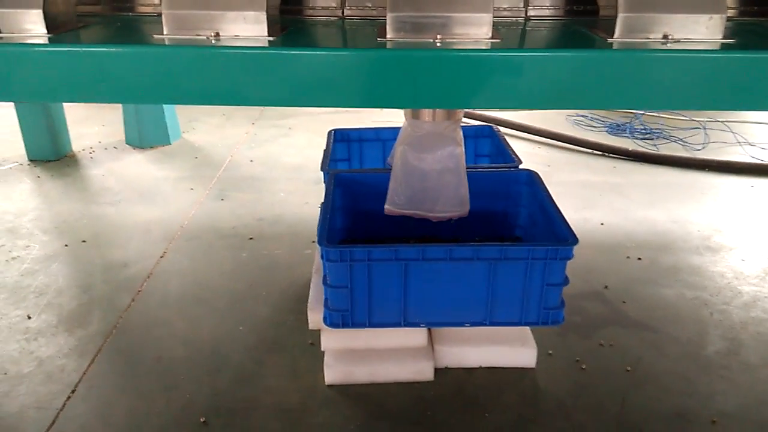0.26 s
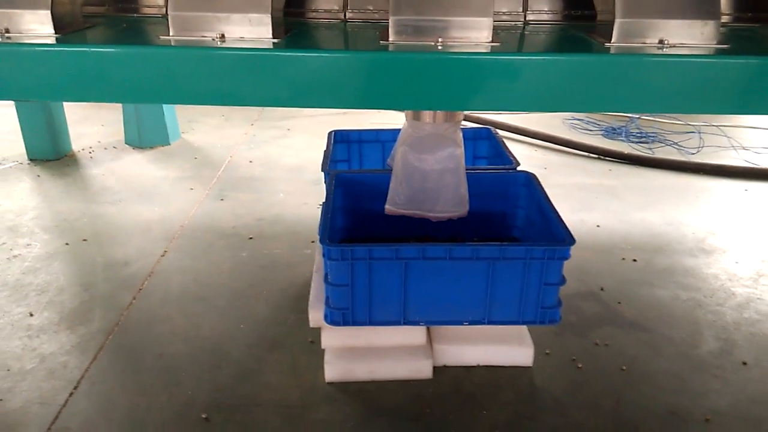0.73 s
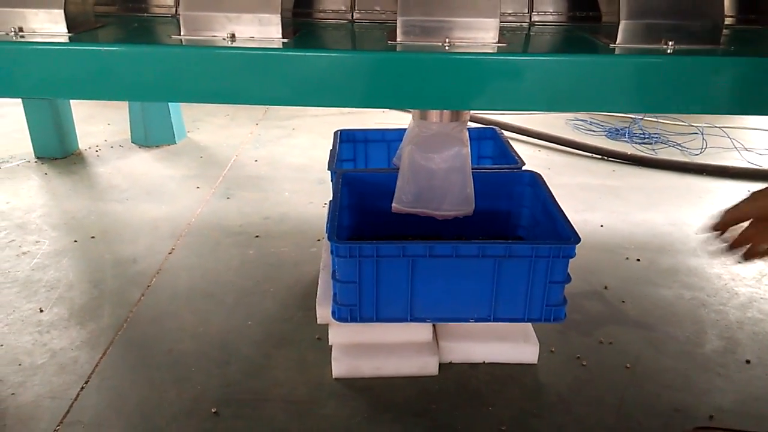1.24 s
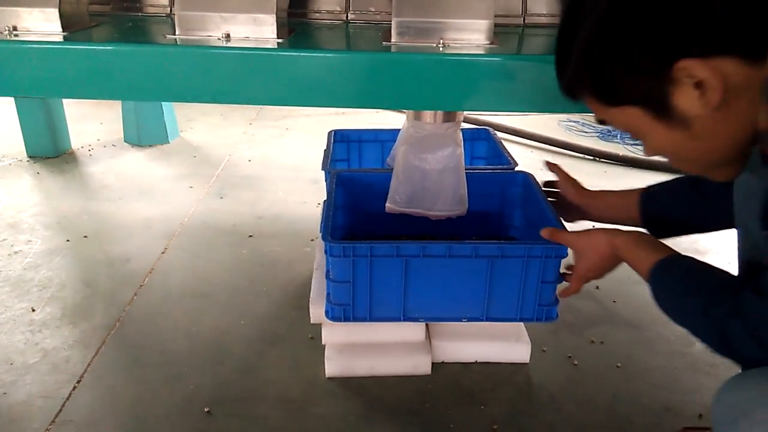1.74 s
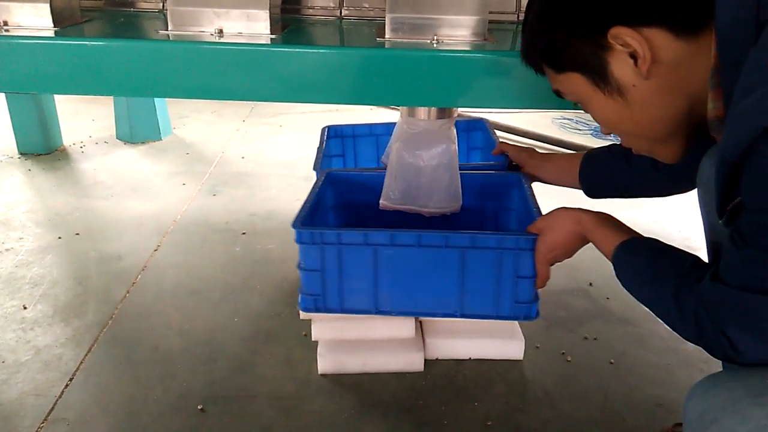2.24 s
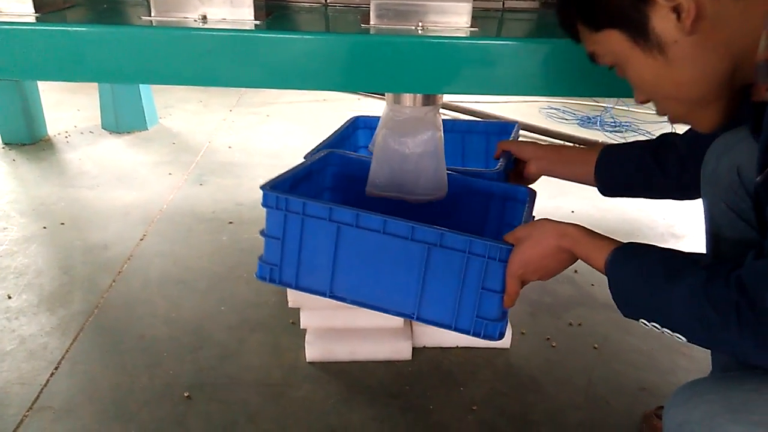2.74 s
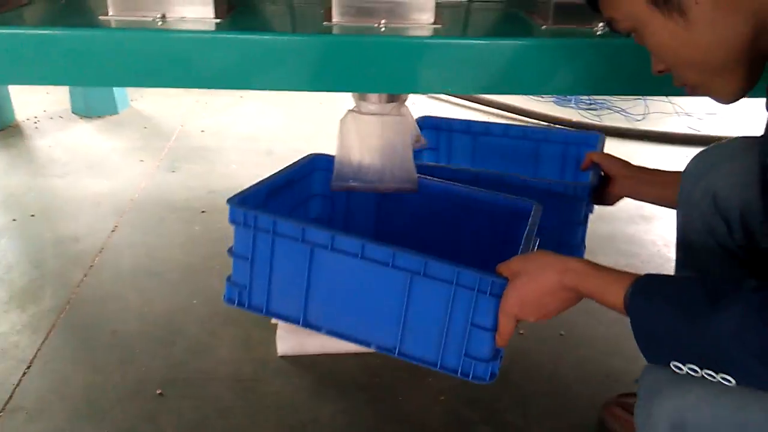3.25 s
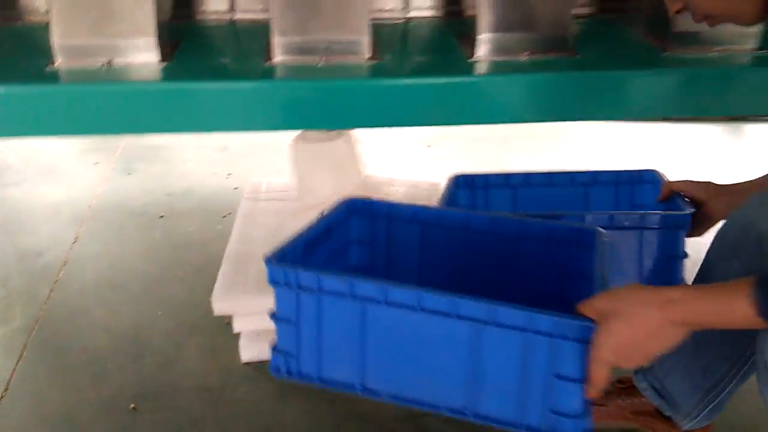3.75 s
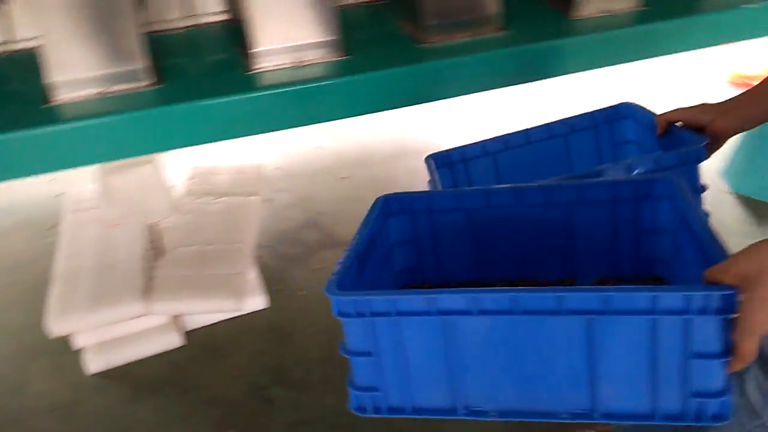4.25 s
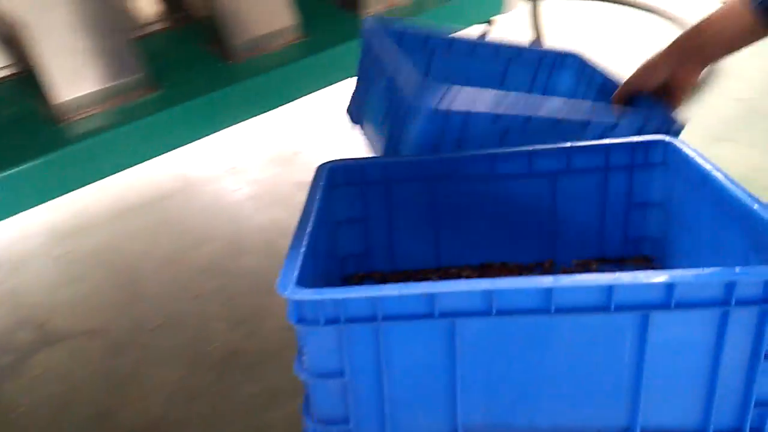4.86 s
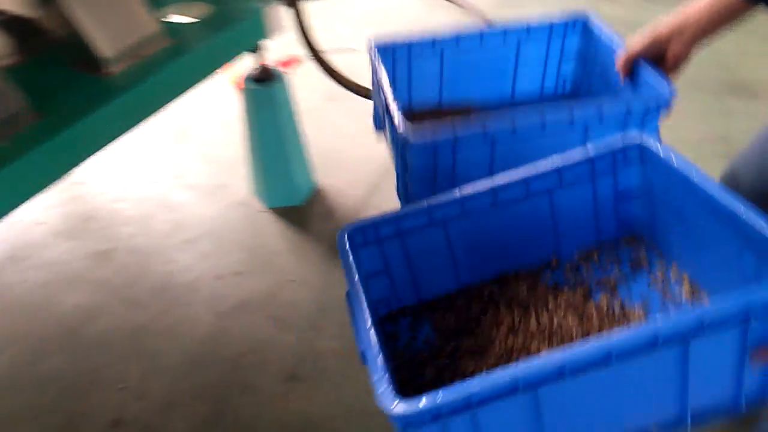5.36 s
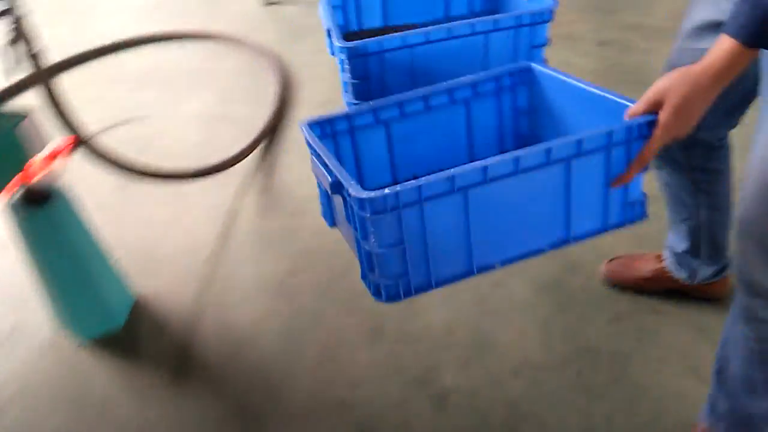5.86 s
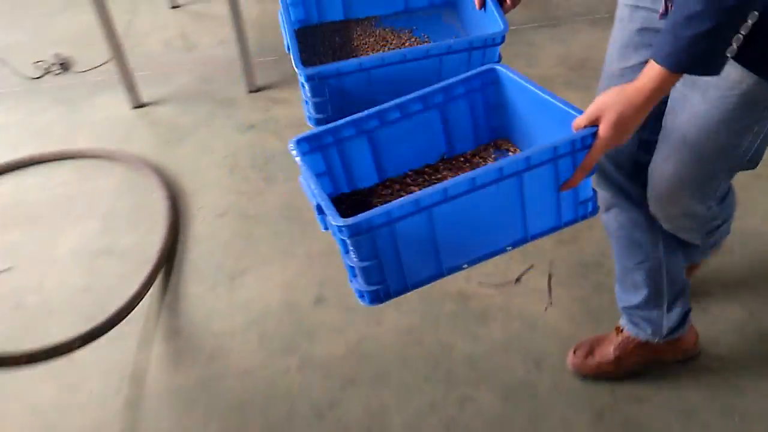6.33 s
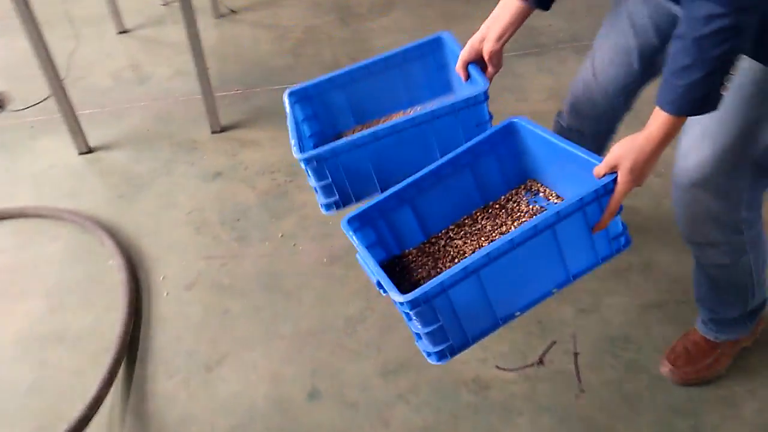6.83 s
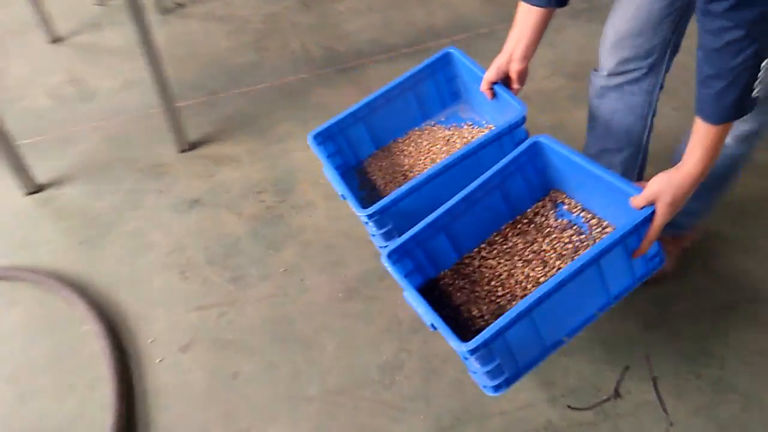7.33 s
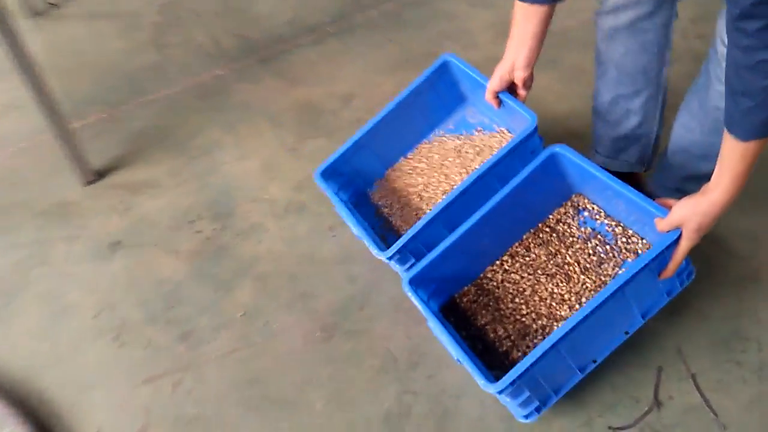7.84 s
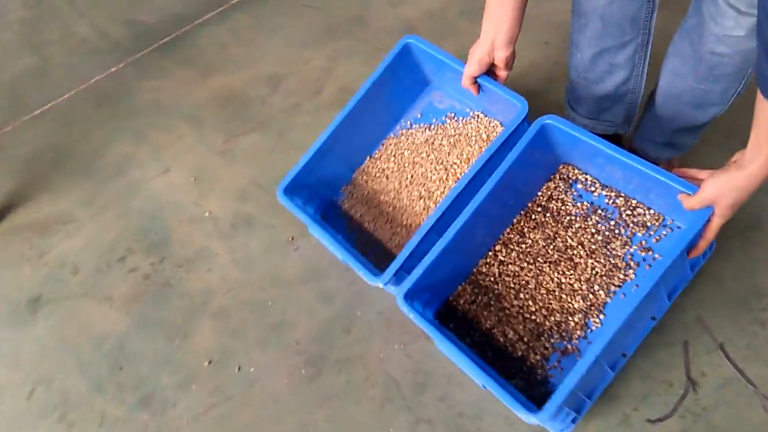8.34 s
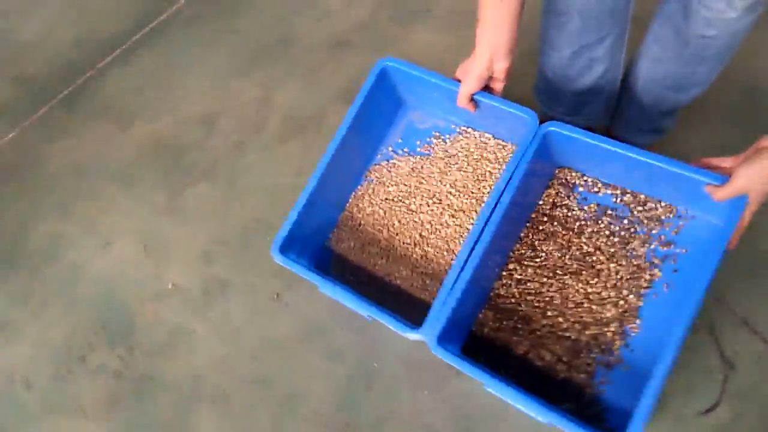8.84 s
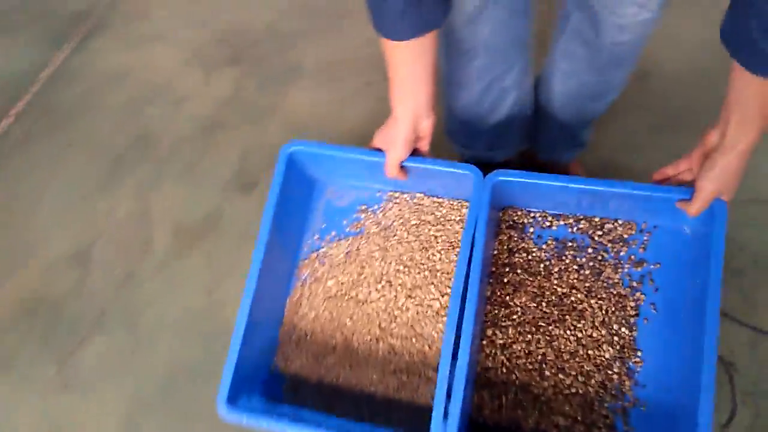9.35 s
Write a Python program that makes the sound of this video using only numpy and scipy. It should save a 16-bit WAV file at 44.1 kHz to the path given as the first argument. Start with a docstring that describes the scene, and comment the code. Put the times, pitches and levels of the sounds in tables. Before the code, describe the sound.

Close stereo handheld microphone in a workshop. Beans tick and patter into plastic bins over a low wavering hum; a valve spits and blasts air, hissing away. Bins are dragged out with dull knocks, creaks and clicks. Beans slide, bursting into one very loud, distorted rush halfway, then several softer swishes, scuffs, brushing cloth and loose bean ticks.

```python
"""Beans patter through plastic bins while a sorting machine hums; soon a valve spits, blasts and hisses on.
Then the bins are pulled out: knocks, clicks, creaks and scuffs join rushes of beans, the fiercest at five seconds.
Later come loose beans and brushing clothes; a faint hollow tone appears early and again near the end.
Beans and rubbing are showers of tiny impacts, knocks are pushed resonances, air is shaped noise, the hum two sines.
A hand-held camera with two microphone ports stands close by in a workshop."""
import sys
import numpy as np
from scipy import signal
from scipy.fft import rfft, irfft, next_fast_len
from scipy.io import wavfile
from scipy.ndimage import uniform_filter1d, map_coordinates

SR = 44100
rng = np.random.default_rng(int(sys.argv[2]) if len(sys.argv) > 2 else 0)


def store_pcm(level_fs):
    """Save levels as 16-bit WAV."""
    pcm = np.round(np.clip(level_fs, -1, 1) * 32767).astype(np.int16)
    wavfile.write(sys.argv[1], SR, np.atleast_2d(pcm).T)


N = 422912

# Levels in the tables are before the small trims set in each source's function.
# Beans sliding over plastic as a bin tilts. Each row: start in seconds, rise in seconds, hold in seconds,
# fall time t60 in seconds, patter level in dB, bin wall level in dB.
SLIDES = [(-0.01, 0.0085, 0.022, 1.1, -38.5, -59), (0.19, 0.038, .025, 0.29, -41.5, -55.5),
          (0.33, .06, .05, .4, -56, -87), (0.48, .015, .02, .35, -50, -82),
          (2.0, .16, 0.017, 0.32, -48.5, -57), (2.27, 0.029, 0.12, .6, -59.5, -66),
          (2.41, 0.093, 0.072, 2.1, -44.5, -60), (2.66, 0.27, 0.18, .7, -44.5, -59),
          (3.0, 0.1, 0.52, 1, -43.5, -52), (3.52, .08, 0.057, 0.64, -38, -42),
          (3.74, .04, 0.12, 2.2, -41.5, -49), (4.08, .2, .07, 1.06, -29.5, -40),
          (4.76, 0.077, 0.076, 0.58, -47, -52.5), (4.912, 0.079, 0.0048, 0.23, -12, -26.5),
          (5.022, 0.057, 0.038, .15, 3, -14), (5.15, .06, 0.023, 0.38, -32, -54.5),
          (5.585, 0.076, 0.025, 0.84, -26.5, -37.5), (5.7, 0.14, 0.22, 0.52, -25, -35),
          (6.28, 0.025, 0.16, .9, -46.5, -59), (6.435, .09, 0.015, .42, -21.5, -33.5),
          (6.56, 0.097, 0.089, 0.53, -34.5, -43.5), (6.71, 0.051, 0.03, 0.3, -30.5, -59),
          (8.22, 0.053, 0.081, 1.4, -48.5, -58), (8.41, 0.096, 0.082, 0.87, -43, -53.5)]
# Heaps of beans jolted in a bin. Each row: start in seconds, level in dB, fall time t60 in seconds.
JOLTS = [(3.865, -43, 0.25), (4.902, -36.5, 0.13), (4.93, -32.5, 0.23), (4.962, -15, 0.056),
         (6.447, -37.5, .15), (6.471, -24.5, 0.088), (7.939, -33, 0.15), (7.954, -29, .17),
         (8.302, -37, 0.076)]
# Clearest clicks of beans and bin rims. Each row: time in seconds, snap peak in dB, body in dB re snap peak.
CLICKS = [(0.0395, -14.5, -31), (0.0643, -20.5, -31.5), (0.0802, -21, -20), (0.1016, -11.5, -24),
          (0.1137, -18.5, -29), (0.1287, -17, -25), (0.1476, -18.5, -11.5), (0.2209, -27, -17),
          (0.2455, -24, -18), (0.2853, -23.5, -11.5), (0.4003, -29.5, -33), (0.4462, -23.5, -19),
          (0.4814, -20.5, -11), (0.485, -18, -11), (0.5016, -19.5, -14.5), (3.2088, -12, -34.5),
          (3.245, -10.5, -20), (3.3682, -13, -34), (3.371, -9, -15.5), (3.3804, -20.5, -6),
          (3.4655, -15.5, -23.5), (3.5375, -17, -27.5), (3.545, -16.5, -9.5), (3.798, -21.5, -3.5),
          (4.4982, -19.5, -11), (4.534, -24.5, -12), (4.633, -20, -16.5), (4.7387, -24.5, -11.5),
          (5.9354, -12.5, -23.5), (6.4717, -16, -15), (6.899, -30.5, -20.5), (6.914, -29, -20.5),
          (7.0534, -38.5, -21), (7.0773, -36, -11.5), (7.425, -25, -40), (8.2867, -31.5, 4.5),
          (8.343, -29, -26.5), (8.6921, -32.5, -28), (8.7208, -30.5, -30), (8.9101, -31.5, -26.5),
          (8.9244, -33.5, -33), (9.2956, -43, -21)]
# Dull knocks on the bins. Each row: time in seconds, low ring peak in dB, mid ring in dB re that peak,
# upper ring in dB re that peak.
KNOCKS = [(0.021, -47, 21, 10), (0.059, -52.5, 17, 18), (0.627, -45.5, -25, -30), (1.244, -45, 5.5, 0),
          (1.329, -38.5, 5.5, 2.5), (2.129, -28.5, -9.5, -10), (2.168, -31.5, -21, -17),
          (2.265, -30, 1.5, -18), (2.477, -46.5, 10.5, -9), (2.694, -33.5, -1, -17), (3.008, -45, 12, 1),
          (3.076, -35, 1.5, 9), (3.15, -41, 9, 9), (3.221, -49.5, 18.5, -3), (3.282, -40, 3, -5),
          (3.371, -33, 2, -1), (3.461, -33.5, 2, -3), (3.596, -31.5, -2, 5.5), (3.629, -32, 4, -4),
          (3.772, -31.5, -3, 5), (4.831, -38.5, 1, 1), (5.09, -22.5, -20, -15), (5.357, -30.5, -13, -30),
          (6.52, -37, -4, -15), (6.666, -42.5, -3, -8), (7.465, -45, -4, -9.5), (7.673, -38, 3.5, 3),
          (7.946, -26.5, -1.5, -25), (8.106, -43, -19, -20), (8.283, -25.5, -21, -28), (8.296, -32.5, 4, 1),
          (8.681, -31, -2, -10), (8.783, -41, -17, -22), (9.245, -45, -17, -26), (9.275, -42, -10, -26)]
# Bins rubbing on their blocks and in the hands, shove by shove. Each row: start in seconds, rise in seconds,
# hold in seconds, fall time t60 in seconds, low flex level in dB, scrape level in dB.
RUBS = [(-0.01, .01, 0.1, .65, -60, -47), (1.15, 0.24, 0.035, 0.77, -54, -51.5),
        (2.02, 0.23, 0.093, 0.36, -44, -50.5), (2.3, 0.17, .45, 1.4, -53, -52),
        (3.0, 0.1, 0.087, .8, -46.5, -44), (3.65, 0.11, 0.072, 2, -46, -44),
        (4.05, 0.26, 0.062, 0.46, -43.5, -63), (4.7, 0.15, .03, 0.43, -47.5, -46),
        (6.8, 0.11, 0.88, 1.3, -66, -66), (7.45, 0.26, .55, 1.1, -55, -62.5),
        (8.35, 0.075, 0.23, 0.86, -52, -50.5), (8.8, 0.17, 0.47, .9, -54, -67)]
# Raspy scuffs of shoes and bin edges. Each row: start in seconds, level in dB, fall time t60 in seconds,
# centre in Hz.
SCUFFS = [(2.01, -50, 0.25, 1480), (3.077, -43, 0.15, 1930), (3.595, -43, 0.15, 2000),
          (3.64, -45.5, 0.093, 2800), (3.772, -46.5, 1, 1500), (6.318, -42, 0.12, 3120),
          (7.672, -37, 0.12, 1550), (7.69, -57, 0.28, 2600), (7.722, -57, 0.26, 1900),
          (8.138, -48, 0.27, 2650)]
# Sleeves and trousers brushing. Each row: start in seconds, rise in seconds, hold in seconds,
# fall time t60 in seconds, level in dB.
BRUSHES = [(7.03, .03, 0.13, 0.61, -49), (7.12, 0.061, .025, 0.81, -43.5), (7.39, 0.036, .02, 0.98, -52),
           (7.62, .06, .02, 0.59, -47.5), (7.99, .03, .04, 0.37, -56), (8.14, 0.095, 0.018, .3, -51),
           (8.93, 0.0383, 0.029, .6, -56.5), (9.28, .02, .02, 1, -58.5)]
# Air leaking from the valves. Each row: time in seconds, level in dB.
LEAK = [(0.55, -78.5), (0.798, -54), (0.938, -47), (1.304, -46), (1.42, -41), (1.65, -47.5), (2.028, -51.5),
        (2.45, -63.5)]
# A hollow tone that comes and goes. Each row: start in seconds, rise in seconds, hold in seconds,
# fall time t60 in seconds, level in dB.
HOLLOW = [(1.58, 0.062, 0.26, .6, -62), (8.89, .035, 0.18, 0.58, -55.5)]
# The vibrator swelling and sinking. Each row: time in seconds, hum level in dB.
VIBRATOR = [(0.0, -52), (0.21, -42), (0.65, -74), (1.4, -43.5), (1.74, -51), (1.9, -31.5), (2.3, -35.5),
            (2.54, -54), (3.0, -34), (3.2, -43), (4.5, -49.5), (4.85, -39), (5.2, -33), (5.9, -38.5),
            (6.45, -36.5), (6.7, -53), (9.0, -58), (9.4, -44)]

# Resonances of the bin floor, long walls, ribs and rim, and of a bin rung by the sliding heap.
# Each row: centre in Hz, width in Hz, relative level in dB (for the last: over the direct rush).
FLOOR_MODES = [(126, 130, -3), (243, 67, -0.5), (300, 150, -3.5), (430, 130, -17.5)]
WALL_MODES = [(488, 120, 2), (575, 110, 8.5), (695, 41, 2.5), (794, 25, -11)]
RIB_MODES = [(1450, 190, 8), (1790, 90, 6.5), (2170, 290, 7), (2660, 290, 1)]
HEAP_MODES = [(280, 45, -2.5), (700, 210, -2.5), (1320, 92, -7.5), (3370, 37, -14.5)]

# Spectra of each noise or impact layer. Each row: frequency in Hz, relative level in dB per Hz.
BEAN_SPECTRUM = [(110, -30), (220, -17.5), (450, -18), (1000, -13.5), (1900, -9), (3000, -8), (4000, -7),
                 (5500, -7.5), (7000, -3.5), (8200, -4), (9800, 0), (11500, -5.5), (14200, -17),
                 (15500, -24)]
CLICK_SPECTRUM = [(1500, -32), (3800, -16), (6500, -6.5), (9800, 3), (12000, -5), (15000, -13.5)]
CLICK_BODY_SPECTRUM = [(200, -37), (600, -10.5), (1500, -8.5), (3000, -8.5), (6000, -14.5)]
FABRIC_SPECTRUM = [(2500, -17.5), (5000, -17), (6500, -11), (7900, -4), (9800, -0.5), (11500, -5),
                   (14400, -16)]
HISS_SPECTRUM = [(710, -58), (1200, -27.5), (1830, -19.5), (2100, -21.5), (2440, -18), (2880, -17.5),
                 (5160, -16.5), (10000, 2), (14100, -11.5), (14500, -13), (15000, -50)]
BLAST_SPECTRUM = [(50, -26), (85, -12.5), (120, 13.5), (165, -12), (230, 6), (310, -7.5), (390, -1.5),
                  (600, -6.5), (1400, -10), (2900, -5), (5300, -8), (9400, -6.5), (14000, -26)]
RUMBLE_SPECTRUM = [(18, -17.5), (32, -0.5), (50, 4.5), (72, 5), (150, -7.5), (280, -8.5), (420, -17),
                   (950, -19.5), (1400, -27.5), (4500, -29), (9700, -17.5), (14500, -36.5)]

# How fast each frequency dies. Each row: frequency in Hz, decay time t60 in seconds.
BLAST_FALL = [(120, 0.92), (500, 0.94), (2000, 0.82), (10000, 0.42)]
WORKSHOP_DECAY = [(150, 0.41), (2000, 0.74), (10000, 0.3)]
BIN_DECAY = [(300, 0.1), (3000, 0.1), (10000, 0.029)]

# Stereo likeness. Each row: frequency in Hz, left-right correlation from 0 to 1.
LIKENESS = [(60, 0.93), (290, 0.92), (640, 0.67), (1400, 0.23), (3090, 0.24), (6800, 0)]
# Balance of the microphone ports. Each row: frequency in Hz, left minus right in dB.
PORT_BALANCE = [(60, 0), (1800, -1.5), (3300, 0.5), (4600, 2.5), (5500, 1), (7000, -4), (8200, -0.5),
                (10000, 16.5), (12400, 13.5), (14300, 6)]

RISE_POWER = 1.25  # every movement gathers speed along this power of time
STRAGGLERS_DB, STRAGGLERS_T60 = -33.5, 1.4  # faint tail of a movement: dB re peak, seconds
# Single bean hops: tries a second, dB over the heap's level, ceiling in dB before the scatter
HOP_RATE, HOP_OVER_DB, HOP_MAX_DB = 14, 13.5, -28.5
HOP_SCATTER_DB, HOP_BODY_DB = 4, -14  # spread of the peaks; body re peak
SNAP_T60 = 0.0097  # seconds
HUM_SWAY_DB, HUM_SWAY_RATE = 2.5, 10  # depth in dB, random knots a second
TOP_HZ = 14400  # nothing passes from here up


def amp(db):
    """Decibels to gain."""
    return 10 ** (np.asarray(db) / 20)


def unit(x):
    """Scale so that the middle of the stereo image has rms 1."""
    middle = np.atleast_2d(x).mean(0)
    return x / np.sqrt(np.mean(middle ** 2) + 1e-20)


def along(points, hz):
    """Interpolate (Hz, value) points on a log frequency axis."""
    f, v = np.transpose(points)
    return np.interp(np.log(hz + 1), np.log(np.abs(f) + 1), v)


def wobble(rate):
    """A smooth random curve through normally scattered knots, rate knots a second."""
    knots = rng.standard_normal(int(N * rate / SR) + 4)
    return map_coordinates(knots, [np.arange(N) * rate / SR])


def fade(t, t60):
    """Exponential decay by 60 dB in t60 seconds."""
    return np.exp(-np.log(1000) * t / t60)


def curve(rows):
    """One gain per sample along (s, dB) points; -120 dB outside them, with soft edges."""
    s, db = np.transpose(rows)
    level_db = np.interp(np.arange(N) / SR, s, db, left=-120, right=-120)
    return uniform_filter1d(amp(level_db), size=300)


def movements(rows):
    """One envelope per dB column: every movement gathers speed, holds, dies away and leaves a faint tail."""
    t, power = np.arange(N) / SR, 0
    for s, rise, hold, t60, *levels in rows:
        after = np.maximum(t - s - rise - hold, 0)
        attack = np.clip((t - s) / rise, 0, 1) ** RISE_POWER
        stragglers = amp(STRAGGLERS_DB) * fade(after, STRAGGLERS_T60)
        shape = attack * np.maximum(fade(after, t60), stragglers)
        power = power + np.outer(amp(levels), shape) ** 2
    return np.sqrt(power)


def strokes(rows, rise=.004):
    """The summed envelope of quick (s, dB, t60) strokes that each die away."""
    t = np.arange(N) / SR
    return sum(amp(db) * np.clip((t - s) / rise, 0, 1) * fade(np.abs(t - s), t60) for s, db, t60 in rows)


def filtered(x, response):
    """x times a response of frequency."""
    n = x.shape[-1]
    m = next_fast_len(n + 8192)
    return irfft(rfft(x, m) * response(np.fft.rfftfreq(m, 1 / SR)), m)[..., :n]


def colour(x, spectrum):
    """x shaped by (Hz, dB) points."""
    return filtered(x, lambda hz: amp(along(spectrum, hz)))


def modal(modes, f):
    """The summed response of (Hz, width, dB) resonances, each at its own dB level at its peak."""
    return sum(amp(db) * 1j * f * w / (c * c - f * f + 1j * f * w) for c, w, db in modes)


def ring(x, modes):
    """x through a group of resonances; soft plastic radiates little below or above them."""
    lowest, highest = modes[0][0], modes[-1][0]

    def soft_top(u):
        return 1 / (1 + np.sqrt(2) * 1j * u - u * u) ** 2

    def response(f):
        low_cut = 1j * f / (lowest + 1j * f)
        return modal(modes, f) * low_cut * soft_top(f / highest / np.sqrt(2))
    return filtered(x, response)


def spread(pair):
    """Two unrelated signals to left and right: alike in the bass, unrelated in the treble."""
    def weights(hz):
        turn = np.arccos(np.clip(along(LIKENESS, hz), -1, 1)) / 2
        return np.array([np.cos(turn), np.sin(turn)])
    mid, side = filtered(pair, weights)
    return np.array([mid + side, mid - side])


def noise(count=N):
    """White stereo noise."""
    return spread(rng.standard_normal((2, count)))


def grains(rate, scatter_db):
    """Random tiny impacts of scattered size, rate a second, evened in level as the rate changes."""
    hit = rng.random((2, N)) < rate / SR
    sizes = rng.standard_normal((2, N)) * amp(scatter_db * rng.standard_normal(N))
    return unit(spread(hit * sizes / np.sqrt(rate)))


def patchy(x, depth_db):
    """The colour of x shifts in patches some hundred hertz wide and some tens of milliseconds long."""
    z = signal.stft(x, nperseg=512)[2]
    field = rng.standard_normal(z.shape[1:])
    for axis in (0, 1):
        field = uniform_filter1d(field, size=7, axis=axis)
    return signal.istft(z * amp(depth_db * field / field.std()), nperseg=512)[1][:, :N]


def tail(decays, count=SR // 2):
    """Stereo noise in which each frequency dies at its own speed, scaled to energy 1 on the left."""
    hz, t, z = signal.stft(noise(count), SR, nperseg=128)
    decay = amp(-60 * t / along(decays, hz)[:, None])
    x = signal.istft(z * decay, SR, nperseg=128)[1]
    return x / np.linalg.norm(x[0])


def echo(x, decays):
    """The answer of a space to x, after a gap of 1.4 ms."""
    delayed = np.pad(tail(decays), ((0, 0), (SR // 700, 0)))
    return signal.fftconvolve(x, delayed, axes=1)[:, :N]


def add(track, s, sound):
    """Mix a sound into the track at time s."""
    part = track[:, max(round(s * SR), 0):][:, :sound.shape[-1]]
    part += sound[..., :part.shape[1]]


def beans(heap, split_hz=3800, calm_rate=3500, rush_rate=400000, patter_db=-0.25, wall_db=1.0,
          clump_db=2.0, smooth_db=-33):
    """Sliding beans: the faster the heap, the denser its impacts; their shells patter and the bin walls rattle."""
    jolt = strokes(JOLTS)
    patter, wall = heap + [jolt, amp(-13.0) * jolt]
    impacts = grains(calm_rate + rush_rate * patter, scatter_db=0.5) * amp(0.15 * wobble(70))
    in_bin = patchy(impacts + .3 * echo(impacts, BIN_DECAY), depth_db=1.4)
    rush = filtered(in_bin, lambda hz: amp(along(BEAN_SPECTRUM, hz)) * (1 + modal(HEAP_MODES, hz)))
    low = filtered(rush, lambda hz: 1 / (1 + (hz / split_hz) ** 4))
    # a slow heap tumbles in clumps, a fast one flows evenly
    clumps = amp(clump_db * wobble(55) / (1 + patter / amp(smooth_db)))
    shells = amp(patter_db) * patter * unit(rush - low)
    rattle = amp(wall_db) * wall * clumps * unit(low)
    return shells + rattle


def hops(heap):
    """Random (s, peak dB, body dB) ticks of single beans, following the strength of the heap's movement."""
    count = int(HOP_RATE * N / SR)
    places = rng.random(count) * (N - 1)
    heap_db = 20 * np.log10(heap[places.astype(int)] + 1e-9)
    peaks = np.minimum(heap_db + HOP_OVER_DB, HOP_MAX_DB)
    peaks = peaks + HOP_SCATTER_DB * rng.standard_normal(count)
    return [(place / SR, db, HOP_BODY_DB) for place, db in zip(places, peaks)]


def clicks(rows, snap_db=0.0, body_db=0, bounce_db=-14, bounce_t60=0.086, body_t60=0.07, rise=0.0008):
    """A hard snap and its quick reflections between the bin walls; the plastic body answers for longer."""
    out, t = np.zeros((2, N)), np.arange(SR // 10) / SR
    contact = 1 - np.exp(-t / rise)
    snap = fade(t, SNAP_T60) + amp(bounce_db) * fade(t, bounce_t60)
    answer = fade(t, body_t60)
    for s, db, body in rows:
        parts = ((snap, CLICK_SPECTRUM, snap_db), (answer, CLICK_BODY_SPECTRUM, body + body_db))
        for shape, spectrum, level in parts:
            sound = colour(noise(len(t)) * contact * shape, spectrum)
            peak = np.abs(sound.mean(0)).max()
            add(out, s + 0.00044, amp(db + level) * sound / peak)
    return out


def knocks(low_db=1.5, mid_db=-1, high_db=-1, chatter=0.071, chatter_t60=0.14, vary_db=3):
    """Each knock is one push and a short chatter of the loose bin; where it lands decides which modes ring most."""
    out, t = np.zeros((2, N)), np.arange(SR // 5) / SR
    for s, db, mid, high in KNOCKS:
        push = chatter * noise(len(t)) * fade(t, chatter_t60)
        push[:, 0] += 1
        groups = ((FLOOR_MODES, low_db), (WALL_MODES, mid + mid_db), (RIB_MODES, high + high_db))
        for modes, level in groups:
            struck = [(hz, width, g + vary_db * rng.standard_normal()) for hz, width, g in modes]
            sound = ring(push, struck)
            peak = np.abs(sound.mean(0)).max()
            add(out, s + .001, amp(db + level) * sound / peak)
    return out


def rubbing(flex_db=-2, scrape_db=-2, rasp_db=-10):
    """Plastic sticks and slips in uneven clumps that set the bin's floor, walls and ribs ringing."""
    flex, scrape = movements(RUBS)
    slips = patchy(grains(1500, scatter_db=2), depth_db=2.5) * amp(1.8 * wobble(28))
    walls = unit(ring(slips, WALL_MODES)) + amp(rasp_db) * unit(ring(slips, RIB_MODES))
    creak = amp(flex_db) * flex * unit(ring(slips, FLOOR_MODES))
    return creak + amp(scrape_db) * scrape * walls


def scuffs(scuff_db=2.0, width_octaves=0.4, skirt_db=-19):
    """Grit rasps briefly under a sole or a bin's edge, each time around its own pitch."""
    grit = patchy(grains(3500, scatter_db=1.5), depth_db=5.5)
    out, t = np.zeros((2, N)), np.arange(SR // 3) / SR
    for s, db, t60, centre in SCUFFS:
        def band(hz):
            octaves = np.log2((hz + 1) / centre)
            skirt = amp(skirt_db) * np.exp(-(octaves / 2) ** 2)
            return np.exp(-(octaves / width_octaves) ** 2) + skirt
        rasp = unit(filtered(grit[:, round(s * SR):][:, :len(t)], band))
        envelope = np.clip(t / .004, 0, 1) * fade(t, t60)
        add(out, s, amp(db + scuff_db) * rasp * envelope)
    return out


def clothes(cloth_db=1.5, left_db=-0.5):
    """Fabric brushes softly as the bins are carried and set down: dense fibre grains, a little to the right."""
    fibres = colour(patchy(grains(13000, scatter_db=1), depth_db=3.5), FABRIC_SPECTRUM)
    brushing = amp(cloth_db + wobble(35)) * movements(BRUSHES)[0]
    return brushing * unit(fibres * amp([[left_db], [-left_db]]))


def air(start=.803, blast_db=-31.0, leak_db=.5, opening=0.0039, turbulence_db=-0.9, crack=(.762, -40, .1)):
    """A valve spits (s, dB, t60), then dumps its pressure, the treble dying first; a leak hisses to the left."""
    flow = curve(LEAK) * amp(leak_db + 0.65 * wobble(25)) + strokes([crack])
    hiss = colour(patchy(noise(), depth_db=1.8), HISS_SPECTRUM)
    out = flow * unit(hiss * amp([[1.5], [-1.5]]))
    blast = colour(patchy(tail(BLAST_FALL, count=SR), depth_db=2), BLAST_SPECTRUM)
    t = np.arange(blast.shape[1]) / SR
    blast = blast * (1 - np.exp(-t / opening)) * amp(turbulence_db * wobble(60)[:len(t)])
    first_burst = blast.mean(0)[:SR // 25].std()  # strength of the first 40 ms
    add(out, start, amp(blast_db) * blast / first_burst)
    return out


def hollow(tone_hz=385, width_hz=35, tone_db=-2):
    """A faint, wavering hollow tone: a narrow band of noise that comes and goes."""
    band = filtered(noise(), lambda hz: np.exp(-((hz - tone_hz) / width_hz) ** 2))
    return amp(tone_db) * movements(HOLLOW)[0] * unit(band)


def machine(hum_hz=64.1, drift_hz=1.4, hum_db=-6.0, second_db=-21, floor_db=-54):
    """The vibrator's wavering hum, a tone and its octave, over the dull rumble of the workshop."""
    phase = 2 * np.pi * np.cumsum(hum_hz + drift_hz * wobble(7.3)) / SR
    sway_db = HUM_SWAY_DB * wobble(HUM_SWAY_RATE) + 1.2 * wobble(27)
    tone = unit(np.sin(phase) + amp(second_db) * np.sin(2 * phase))
    hum = curve(VIBRATOR) * tone * amp(hum_db + sway_db)
    rumble = unit(colour(noise(), RUMBLE_SPECTRUM))
    return hum + amp(floor_db + 0.51 * wobble(8.7)) * rumble


def scene(room_db=-17):
    """Bins and beans sound in the workshop, with the machine behind them."""
    heap = movements(SLIDES)
    near = beans(heap) + clicks(CLICKS + hops(heap[0])) + knocks()
    near = near + rubbing() + scuffs() + clothes()
    room = amp(room_db) * echo(near, WORKSHOP_DECAY)
    return near + room + air() + hollow() + machine()


def record(dry):
    """The two ports differ in treble response; the loudest rush overloads the input, and the top is cut off."""
    def ports(hz):
        ratio = amp(along(PORT_BALANCE, hz))
        even_power = np.sqrt(2 / (1 + ratio ** 2))
        return np.array([ratio, np.ones_like(ratio)]) * even_power
    clipped = np.clip(filtered(dry, ports), -1, 1)
    return filtered(clipped, lambda hz: hz < TOP_HZ)


dry = scene()
out = record(dry)
store_pcm(out)
```